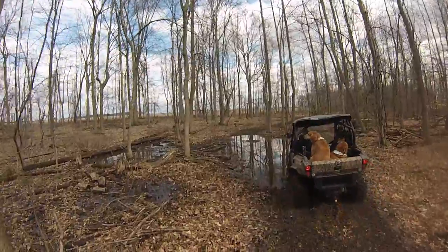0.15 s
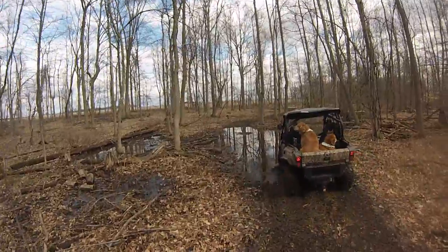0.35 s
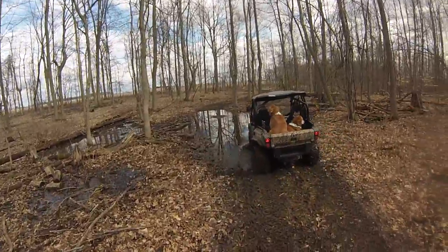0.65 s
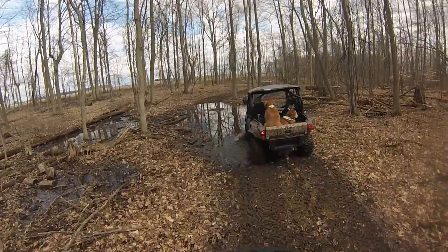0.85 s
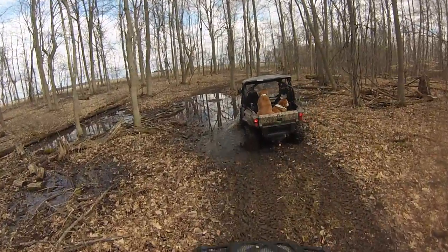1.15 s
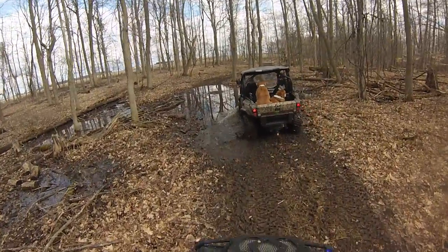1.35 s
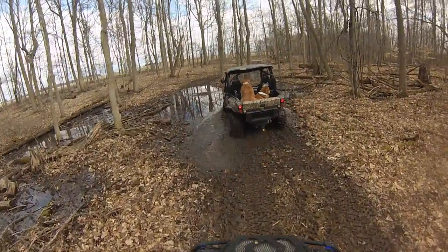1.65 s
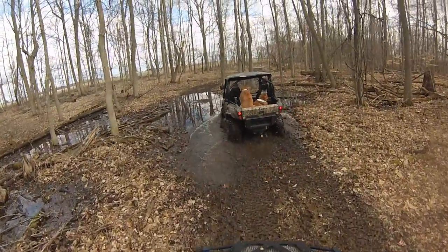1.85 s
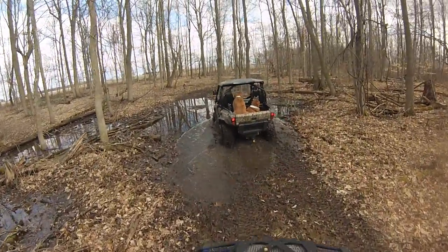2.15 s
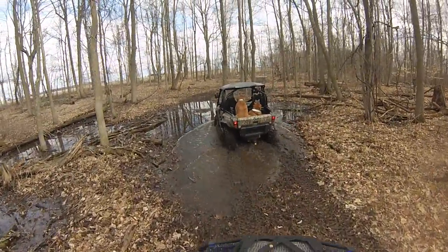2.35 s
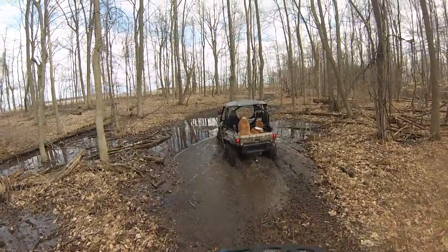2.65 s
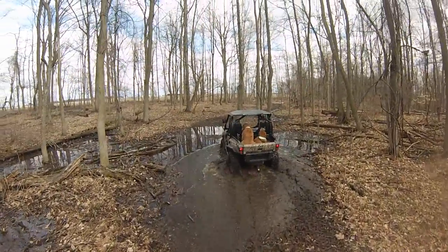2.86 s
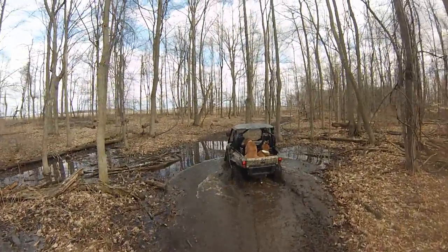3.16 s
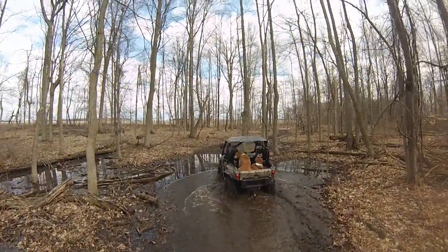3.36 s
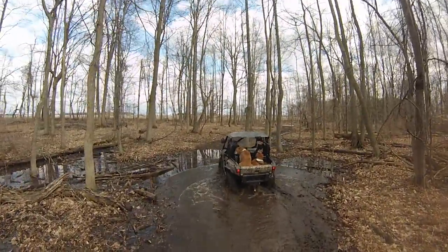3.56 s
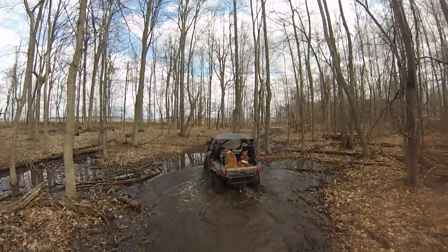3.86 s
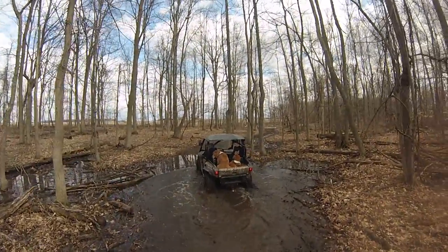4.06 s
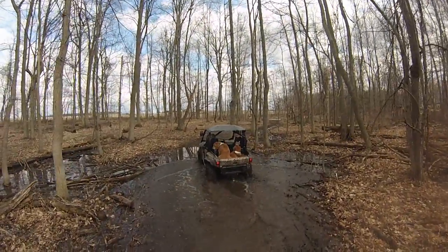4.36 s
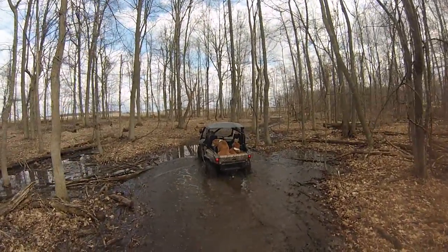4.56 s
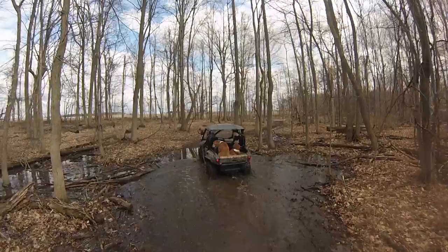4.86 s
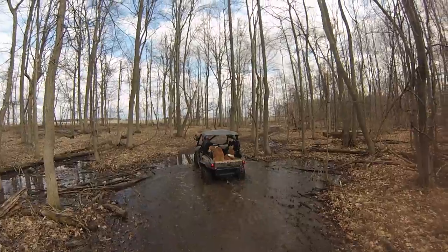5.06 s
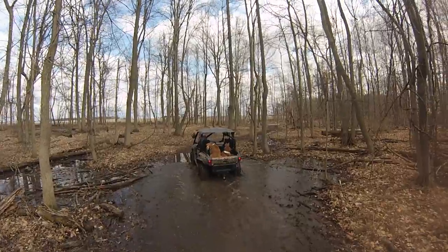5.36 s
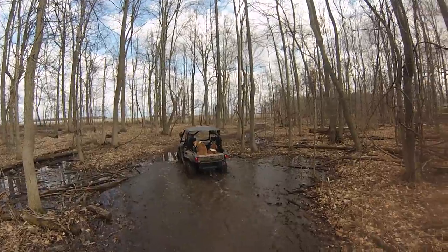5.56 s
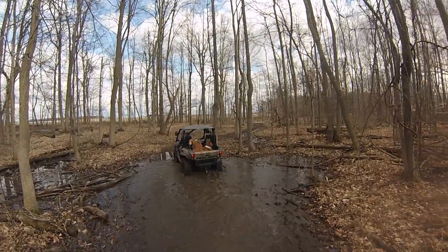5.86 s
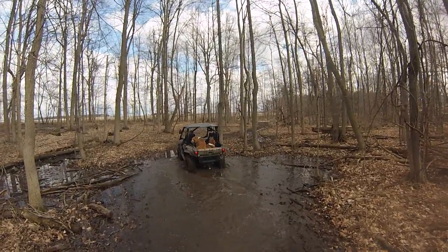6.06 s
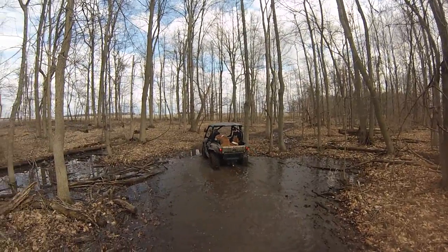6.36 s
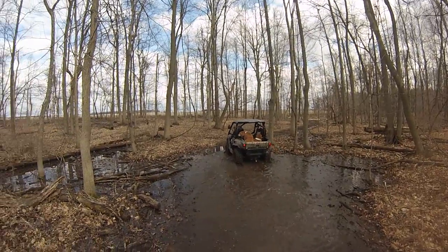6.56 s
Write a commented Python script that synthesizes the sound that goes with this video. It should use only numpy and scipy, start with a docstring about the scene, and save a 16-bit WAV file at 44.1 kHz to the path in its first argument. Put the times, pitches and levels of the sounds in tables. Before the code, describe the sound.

From 0 s a near twin-cylinder off-road engine pulls with a deep, muffled boom, swelling to about 0.6 s, easing near 1.2 s, then climbing to its strongest, fastest pull around 2.3-2.8 s. Tyre rumble, jolts, boxy housing hiss and dry frame rattle pulse with it; thin, fluttering gear whines come and go, most noticeable from 1.2 s. At about 2.8-2.9 s the throttle shuts, the boom collapses and short whines fall away. It stumbles and slows into a quiet, lumpy idle that lasts to the end at 6.7 s. The second engine, some metres ahead, emerges as a steadier buzzing drone, hardening around 3.2-3.8 s and slowly rising in pitch. From 3 s faint gurgles, spray and separate plops of muddy water grow, more frequent after 5.4 s. Outdoors, dry, microphone in a closed housing, faint hiss beneath.

```python
"""A muddy woodland trail, heard by a camera in a closed housing on a small off-road vehicle that follows another.
The near twin-cylinder engine, a sum of sines on its orders, pulls with a deep boom, swells, then drops to a lumpy idle.
The engine ahead, built the same way, drones on and slowly gains speed.
Shaped noise makes the rattle, housing hiss and tyre rumble; wavering sines make the gear whines;
short rising tones and noise bursts make the muddy water."""
import sys
import numpy as np
from scipy import signal
from scipy.io import wavfile
from scipy.ndimage import uniform_filter1d

SR = 44100
rng = np.random.default_rng(int(sys.argv[2]) if len(sys.argv) > 2 else 0)


def output_pcm(signal):
    """Save a mono or channel-first signal as 16-bit PCM at the path in sys.argv[1].

    Samples are clipped to [-1, 1] before scaling.
    """
    pcm = np.clip(np.atleast_2d(signal).T, -1, 1) * 32767
    wavfile.write(sys.argv[1], SR, np.round(pcm).astype(np.int16))


def elevation(decibels):
    """Turn decibel levels (scalar or array-like) into linear amplitude ratios."""
    levels = np.asarray(decibels, float)
    return 10 ** (levels / 20)


N = 295911
T = np.arange(N) / SR

# near engine under load: (time [s], cycle rate [Hz], exhaust boom on order 2 [dB])
PULL = [(0.0, 18.9, -46.0), (0.15, 19.2, -42.0), (0.3, 19.8, -41.4), (0.6, 20.28, -38.0),
        (0.9, 19.75, -38.5), (1.05, 19.27, -40.7), (1.2, 18.96, -44.0), (1.55, 19.35, -42.0),
        (1.8, 20.21, -37.8), (1.95, 20.69, -37.2), (2.25, 22.85, -35.0), (2.4, 23.49, -35.5),
        (2.55, 23.31, -33.8), (2.75, 22.45, -32.9), (2.8, 21.62, -33.3), (2.84, 20.89, -35.3),
        (2.87, 20.4, -38.5), (2.9, 20.1, -41.5), (2.915, 19.95, -57), (2.94, 19.76, -64)]
TWIN_GAP = 0.4  # share of a cycle between the two firings
PARKED_DB = -80  # rattle level that counts as no shake


def evened(x):
    """Scales a signal to rms 1."""
    return x / np.sqrt(np.mean(x ** 2) + 1e-20)


def curves(rows):
    """Columns over the whole time, after a window that is open while the table lasts."""
    s, *columns = np.transpose(rows)
    lasts_to_end = s[-1] > T[-1] - 0.1
    inside = (T >= s[0]) * ((T <= s[-1]) | lasts_to_end)
    gate = uniform_filter1d(1.0 * inside, size=2000)
    return gate, *(np.interp(T, s, c) for c in columns)


def bumps(rows, width):
    """Short bell-shaped changes of level in dB; width in s."""
    return sum(db * np.exp(-((T - s) / width) ** 2) for s, db in rows)


def drift(hz):
    """Slow random wander of rms 1, up to about hz."""
    knots = rng.standard_normal(int(T[-1] * 200))  # 200 a second
    smooth = signal.filtfilt(*signal.butter(2, np.clip(hz / 100, 0.01, 0.9)), knots)
    return np.interp(T, np.arange(len(knots)) / 200, evened(smooth))


def noise(points, patchy_db, band):
    """Random short-time spectra in drifting patches, close to rms 1 inside band (Hz)."""
    frames, hz = N // 512 + 5, np.fft.rfftfreq(2048, 1 / SR)
    real, imaginary, patches = rng.standard_normal((frames, 1025, 3)).T
    patches = uniform_filter1d(patches, size=12, axis=0)  # over frequency
    patches = evened(uniform_filter1d(patches, size=6, axis=1))  # over time
    f, db = np.transpose(points)
    shape = elevation(np.interp(np.log(hz + 1), np.log(f + 1), db, left=-90, right=-90))
    in_band = (hz > band[0]) & (hz < band[1])
    share = np.sum(shape[in_band] ** 2) / np.sum(shape ** 2)
    spectra = (real + 1j * imaginary) * shape[:, None] * elevation(patchy_db * patches)
    sound = signal.istft(spectra, nperseg=2048, noverlap=1536)[1][:N]
    return evened(sound) / np.sqrt(share)


def orders(cycle_hz, levels, uneven_db, lag, second=0.0, start=0.0, lead=0.0, pipe_hz=28.5, steep=16):
    """One sine per engine order; uneven firing shakes the high orders most."""
    turn = 2 * np.pi * (start + np.cumsum(cycle_hz) / SR)
    out = np.zeros(N)
    for k, db in levels:
        shake = uneven_db * np.sqrt(k)
        above = max(k - 5, 0)
        # the second cylinder's thump
        twin = np.angle(1 + second * np.exp(-2j * np.pi * k * TWIN_GAP))
        # reversed below the exhaust pipe's lowest resonance
        pipe = np.pi / (1 + (k * cycle_hz / pipe_hz) ** steep)
        phase = k * turn + lag * above ** 2 + lead * above + twin + pipe + 0.12 * shake * drift(8.0)
        out += np.sqrt(2) * elevation(db + shake * drift(8.8)) * np.cos(phase)
    return out, turn


def follow(law, load_db, rattle_db):
    """A level in dB that rises with engine load and with the shake of the frame."""
    rest_db, by_load, by_shake = law
    return rest_db + by_load * load_db + by_shake * (rattle_db - PARKED_DB)


def bubbles(begin_s):
    """Clumps of short bubbles that rise in pitch as they ring."""
    t, out = T[:1200], np.zeros(N)
    # typically 110 a second, shared among 12 pitches
    rate = 110 / 12 * elevation(4 * drift(3.0)) * (T > begin_s)
    for hz in np.geomspace(1050, 2600, num=12):
        tone = np.sin(2 * np.pi * hz * t * (1 + 6 * t))
        bubble = tone * (1 - np.exp(-t / 0.001)) * np.exp(-t * hz / 7)
        hits = (rng.random(N) < rate / SR) * elevation(2.5 * rng.standard_normal(N))
        out += signal.oaconvolve(hits, bubble)[:N]
    return out


def thrown_water(begin_s):
    """Spray: noise under random bursts that die away exponentially."""
    # thrown water: (frequency [Hz], relative density [dB per Hz])
    spray = [(850, -38), (1120, -1.5), (1300, -1.5), (1750, 2), (2100, -7), (2330, 7), (2600, -15.5),
             (3600, -17.5), (6000, -32)]
    throws_per_s, decay_s = 20, 0.009
    throws = (rng.random(N) < throws_per_s / SR) * (T > begin_s) * elevation(2.1 * rng.standard_normal(N))
    bursts = signal.oaconvolve(throws, np.exp(-T[:3000] / decay_s))[:N]
    return bursts * noise(spray, 1.0, band=[900, 2800])


def slosh():
    """Wheels ahead churn the puddle: gurgles and spray grow as they wade deeper, and single plops ring the housing."""
    # single loud plops: (time [s], peak level before the 3 dB cut below [dB], frequency [Hz])
    plops = [(3.552, -63, 1460), (3.681, -55.5, 1500), (3.8868, -64, 1440), (4.0055, -59, 1500),
             (4.8182, -64, 1530), (4.902, -69, 1450), (5.1235, -64, 1480), (5.4335, -60, 1480),
             (5.56, -62, 1500), (5.72, -68, 2350), (5.915, -64, 1200), (6.11, -67, 1150), (6.12, -65, 2150),
             (6.17, -61, 1600), (6.215, -68, 2350), (6.2513, -62, 1560), (6.256, -62, 1180),
             (6.3235, -63, 1490), (6.627, -63, 1460), (6.632, -65, 1120)]
    begin_s, growth_db_per_s = 2.9, 1.4
    water = elevation(-81) * bubbles(begin_s) + elevation(-82) * thrown_water(begin_s)
    out = elevation(growth_db_per_s * (T - begin_s)) * water
    t, plop_s = T[:1200], 0.005
    for s, db, hz in plops:
        part = out[round(s * SR):][:len(t)]
        plop = elevation(db - 3) * np.sin(2 * np.pi * hz * t) * np.exp(-(t / plop_s) ** 2)
        part += plop[:len(part)]
    return out


def ground_rumble(load_db, rattle_db, throb):
    """Body rumble and tyre growl pump with the engine cycle; ruts jolt them up and rolling to a stop adds a grumble."""
    # body rumble: (frequency [Hz], relative density [dB per Hz])
    rumble_shape = [(8, 13), (25, 28.5), (45, 19), (70, 25.5), (130, 8.5), (200, 6.5), (300, 1.5),
                    (400, 3.5), (560, 1.5), (700, 0), (900, -11), (1200, -28.5)]
    # tyres on rough ground: (frequency [Hz], relative density [dB per Hz])
    growl_shape = [(110, -31), (170, -1.5), (220, -2), (300, -3.5), (380, -11.5), (500, -30.5)]
    # ruts under the wheels: (time [s], lift [dB])
    jolts = [(.5, 3.5), (.93, 3.8), (1.88, 4.3), (2.03, 4.2), (2.18, 6.9), (2.3, 1.9), (2.4, 3), (2.5, 5.7),
             (2.56, 2.4), (2.78, 2.6)]
    # (level at rest [dB], gain per dB of load [dB], gain per dB of shake [dB])
    rumble_law = (-82, 0.31, 0.19)
    growl_law = (-88.5, .3, .9)
    stop_db = bumps([(3.3, 2)], 0.51)  # the near vehicle rolls to a stop
    lift_db = 0.75 * throb + bumps(jolts, 0.04) + stop_db
    rumble_db = follow(rumble_law, load_db, rattle_db) + lift_db
    growl_db = follow(growl_law, load_db, rattle_db) + lift_db
    rumble = noise(rumble_shape, 0.98, band=[400, 750]) * elevation(rumble_db)
    return rumble + noise(growl_shape, 1.1, band=[150, 400]) * elevation(growl_db)


def housing_hiss(load_db, rattle_db, throb, flicker):
    """Noise around the main ring of the housing, pumped by the engine cycle."""
    # (frequency [Hz], relative density [dB per Hz])
    hiss_shape = [(470, -43), (800, -13), (989, -10), (1220, -7), (1310, -7), (1370, -2), (1520, 3),
                  (1690, -6), (1950, -10), (2540, -29), (4290, -120)]
    # (level at rest [dB], gain per dB of load [dB], gain per dB of shake [dB])
    hiss_law = (-75.5, 0.19, 0.58)
    hiss_db = follow(hiss_law, load_db, rattle_db) + 1.1 * throb + 0.6 * flicker
    return noise(hiss_shape, 0.92, band=[1100, 1900]) * elevation(hiss_db)


def frame_rattle(rattle_db, throb, flicker):
    """The rolling frame rattles as noise, and loose parts tick faintly as short high rings."""
    # (frequency [Hz], relative density [dB per Hz])
    rattle_shape = [(1700, -34.5), (2000, -3.5), (2350, 0.5), (2600, -2), (2780, -8.5), (2960, -5.5),
                    (3100, -3.5), (3260, -2.5), (3450, -10.5), (5200, -13.5), (5900, -20.5), (6600, -17.5),
                    (7600, -31.5), (10500, -44.5)]
    level_db = rattle_db - 3.5 + 0.34 * throb + 0.71 * flicker
    rattle = noise(rattle_shape, 0.97, band=[2000, 4000]) * elevation(level_db)
    strength = elevation(1.5 * np.minimum(rng.exponential(1, N), 2.5)) * rng.standard_normal(N)
    hits = (rng.random(N) < 150 / SR) * strength  # about 150 a second
    t = T[:200]
    ring = np.sin(2 * np.pi * 5200 * t) + np.sin(2 * np.pi * 6700 * t) + 0.19 * np.sin(2 * np.pi * 9500 * t)
    tick = np.exp(-t / 0.00066) * ring
    return rattle + elevation(rattle_db - 8) * signal.oaconvolve(hits, tick)[:N]


def gear(start, length, hz, top_db):
    """A fuzzy whine on one swell: tooth contact flutters in level and pitch."""
    u = 2 * (T - start) / length - 1  # -1 at its start, 1 at its end
    swell_db = -14 * np.minimum(u ** 4, 10)  # starts and ends 14 dB under its top
    turn = 2 * np.pi * np.cumsum(hz * (1 + 0.0075 * drift(60.0))) / SR
    return np.sqrt(2) * elevation(top_db + swell_db + 3.0 * drift(29.0)) * np.sin(turn)


def drivetrain_whines():
    """Gear and belt whines follow the road speed, hold near one pitch or follow the crank."""
    # gear mesh tone, set by road speed: (time [s], frequency [Hz])
    road = [(0, 680), (.12, 660), (.33, 680), (.43, 735), (.52, 752), (.6, 680), (.9, 682), (1.15, 765),
            (1.3, 785), (1.55, 806), (1.62, 824), (1.8, 840), (2.05, 862), (2.2, 885), (2.785, 888),
            (2.85, 785), (2.89, 722), (2.95, 690), (3.1, 590)]
    # swelling with the road speed: (start [s], length [s], multiple of the mesh tone, top level [dB])
    meshed = [(-.1, .48, 1, -83), (.4, .16, 1, -83), (.56, .4, 1, -84), (1.22, .62, 1, -78.5),
              (1.22, .4, 3, -73.5), (1.56, .56, 3.08, -77), (2.1, .4, 3, -84), (2.5, .3, 3, -80),
              (1.22, .12, 1.97, -71), (1.38, .22, 1.99, -73), (1.3, .4, 3.95, -83), (.1, .75, 2.9, -85),
              (2.77, .1, 3, -71.5), (2.86, .05, 3, -79), (2.76, .15, 1, -80), (2.93, .13, .95, -81),
              (2.92, .1, 1.87, -72), (3.03, .07, 1.87, -80), (2.91, .07, 3.72, -79), (2.99, .08, 3.72, -78),
              (2.2, .35, 2.35, -78), (2.3, .46, 3.35, -80)]
    # holding near one pitch: (start [s], length [s], frequency [Hz], top level [dB])
    held = [(.2, 1., 3270, -86), (1.3, .6, 3270, -79), (2., .85, 3220, -85), (2.82, .05, 2360, -73.5),
            (2.9, .1, 3250, -82), (3.17, .08, 2350, -81), (-.1, .55, 1390, -80), (.55, .85, 1390, -77.5),
            (.52, .45, 1252, -84), (.88, .25, 2960, -84), (1.85, .6, 2965, -85)]
    # geared to the crank: (start [s], length [s], multiple of the engine cycle, top level [dB])
    cranked = [(1.28, .4, 54.6, -83), (1.9, .5, 55.8, -79), (2.4, .3, 54.5, -84), (2.68, .14, 54.5, -80)]
    mesh_hz, cycle_hz = curves(road)[1], curves(PULL)[1]
    rows = [(s, length, k * mesh_hz, db) for s, length, k, db in meshed] + list(held)
    rows = rows + [(s, length, k * cycle_hz, db) for s, length, k, db in cranked]
    return sum(gear(*row) for row in rows)


def engine_ahead():
    """A steadier, thinner drone from some metres away: one hard thump in every cycle."""
    # (time [s], cycle rate [Hz], order 6 before the lifts below [dB])
    ahead = [(0.0, 22.0, -70), (0.5, 21.6, -70.5), (0.75, 20.65, -72.8), (1.0, 19.19, -74.9),
             (1.5, 21.06, -73.3), (2.0, 21.84, -71.5), (2.25, 22.6, -69.5), (2.95, 23.9, -71.4),
             (3.31, 24.0, -71.6), (3.8, 24.6, -70.3), (4.04, 25.3, -70), (4.31, 25.7, -70),
             (4.44, 25.6, -69.6), (4.72, 26.2, -67.9), (4.98, 25.9, -67.4), (5.09, 26.4, -68),
             (5.32, 26.9, -68.1), (5.82, 26.6, -68.4), (5.94, 26.7, -70), (6.46, 27.3, -71.5),
             (6.7, 27.1, -71)]
    # (multiple of the cycle, level against order 6 [dB])
    ahead_orders = [(2, -4.5), (3, -7), (4, 5.5), (5, -11.5), (6, 0), (7, -9), (8, -13), (9, -8.5),
                    (10, -12), (11, -22), (12, -20.5), (14, -22), (15, -23.5), (18, -24), (20, -29)]
    # body panels and ground lift or hollow out orders that slide past: (frequency [Hz], width [Hz], lift [dB])
    panels = [(117.3, 7, 6), (208, 8, -4.5), (256, 13, 5.5), (322, 20, 5), (486, 8, 9), (526.4, 7, 11)]
    _, hz, sixth_db = curves(ahead)
    # it digs in entering the puddle: orders harden by their distance from the sixth
    dig_db_per_order = bumps([(3.75, 0.93)], 0.68)
    # just before, orders 14 and 15 blare out
    blare_db = bumps([(3.16, 9)], 0.4)
    levels = []
    for k, rel_db in ahead_orders:
        hard_db = dig_db_per_order * abs(k - 6) if k < 12 else blare_db * (k in (14, 15))
        panel_db = sum(lift * np.exp(-((k * hz - at_hz) / width) ** 2) for at_hz, width, lift in panels)
        levels.append((k, sixth_db + rel_db + hard_db + panel_db))
    return orders(hz, levels, uneven_db=0.2, lag=-0.08, pipe_hz=123, steep=8)[0]


def near_pull(crack_lead):
    """The exhaust under load: its gate, orders, cycle angle and load in dB; load roughens orders 6 and up."""
    # (multiple of the cycle, level against order 3 before the rasp [dB])
    pull_orders = [(1, -29), (4, -11.5), (5, -9.5), (6, -26), (7, -39.5), (8, -34.5), (9, -21.5), (10, -21),
                   (11, -20.5), (12, -27.5), (13, -28), (14, -33), (15, -23), (16, -33)]
    on, hz, boom_db = curves(PULL)
    # order 3 thins as the speed rises, and dies once the throttle shuts at 2.75 s
    third_db = -50.5 - 2 * (hz - 18.32) - 130 * np.clip(T - 2.75, 0, 0.25)
    load_db = np.maximum(boom_db + 47, 0)  # a boom of -47 dB or less counts as no load
    rasp_db = -5.5 + 0.32 * load_db
    levels = [(2, boom_db), (3, third_db)]
    levels += [(k, third_db + db + (k > 5) * rasp_db) for k, db in pull_orders]
    pull, turn = orders(hz, levels, uneven_db=0.46, lag=0.0, start=-0.3, lead=crack_lead)
    return on, pull, turn, load_db


def near_idle():
    """The exhaust with the throttle shut: its gate, orders and cycle angle; stumbles make firings weak or strong."""
    # (time [s], cycle rate [Hz], order 5 before the stumbles [dB])
    idle_curve = [(2.92, 14.13, -66), (3.0, 13.55, -68), (3.1, 13.48, -62.4), (3.25, 12.93, -60.5),
                  (3.45, 12.16, -61.3), (3.85, 11.76, -60.5), (4.05, 11.21, -59.6), (4.25, 11.05, -60.4),
                  (4.45, 10.05, -61.1), (4.75, 9.83, -58.4), (5.05, 10.37, -57.3), (5.45, 10.0, -58.0),
                  (5.65, 10.34, -57.6), (5.85, 10.12, -60.8), (6.65, 10.02, -60.8)]
    # (multiple of the cycle, level against order 5 [dB])
    idle_orders = [(1, -25.5), (6, -17), (7, -15), (8, -10.5), (9, -20.5), (10, -24), (11, -33.5)]
    # low orders sink out of the pipe's reach as the engine slows:
    # (multiple of the cycle, level at 9.85 Hz [dB], gain per Hz of cycle rate [dB], top level [dB])
    idle_low = [(2, -77, 2.3, -61), (3, -64, 3.64, -49), (4, -70, 4.5, -60.5)]
    # weak or strong firings: (time [s], change [dB])
    stumbles = [(2.915, -6), (2.96, 4), (3.135, 3), (3.175, -12), (3.25, -7), (3.29, 3), (3.33, -6),
                (3.44, -4), (3.63, -5), (3.81, -4), (3.96, -5)]
    off, hz, fifth_db = curves(idle_curve)
    levels = [(k, np.minimum(db + gain * (hz - 9.85), top_db)) for k, db, gain, top_db in idle_low]
    levels += [(5, fifth_db)] + [(k, fifth_db + db) for k, db in idle_orders]
    idle, turn = orders(hz, levels, uneven_db=0.25, lag=-0.05, second=0.9, start=-0.28)
    return off, elevation(bumps(stumbles, 0.025)) * idle, turn


def near_engine():
    """Joins pull and idle; returns the exhaust, the throb of its cycle and its load in dB."""
    crack_lead = 1.85  # radians of the cycle by which the crack of orders 6 and up precedes the boom
    on, pull, turn, load_db = near_pull(crack_lead)
    off, idle, slow_turn = near_idle()
    turn = turn + crack_lead
    pull_throb = np.cos(turn) + 0.29 * np.cos(2 * turn)
    idle_throb = np.cos(slow_turn) + np.cos(2 * slow_turn - 2 * np.pi * TWIN_GAP)
    throb = on * pull_throb + 0.13 * off * idle_throb
    # under load each cycle starts as a pressure drop
    return off * idle - on * pull, throb, load_db


def scene():
    """Sums both engines, the running noises of the near vehicle and the water."""
    # how hard the rolling frame shakes: (time [s], rattle level before trims [dB])
    shake = [(0, -74), (.25, -72.5), (.45, -71.5), (1, -70), (1.4, -68.5), (1.85, -69.5), (2.3, -69),
             (2.85, -70.5), (3.1, -75.5), (3.3, -76), (4, -78), (4.8, -80.5), (5.6, -79.5), (6.7, -80.5)]
    exhaust, throb, load_db = near_engine()
    rattle_db = curves(shake)[1]
    flicker = drift(29.0)  # shared by hiss and rattle
    running = ground_rumble(load_db, rattle_db, throb)
    running = running + housing_hiss(load_db, rattle_db, throb, flicker)
    running = running + frame_rattle(rattle_db, throb, flicker)
    return (slosh() + running + drivetrain_whines() + engine_ahead() + exhaust)[None]


def band_limit(x):
    """A steep low-pass at the top of the band."""
    return signal.sosfilt(signal.butter(12, 12600, fs=SR, output="sos"), x)


def record(dry):
    """The microphone adds hiss and the camera electronics a faint steady whine."""
    # microphone hiss: (frequency [Hz], relative density [dB per Hz])
    hiss_floor = [(2060, -41), (3500, -3), (4560, -5.5), (5100, -7), (6140, -6), (6650, -4), (7520, -6.5),
                  (12400, -10.5), (16200, -42.5), (22000, -120)]
    # camera electronics: (frequency [Hz], peak level [dB])
    electronic = [(3596.4, -95), (7192.8, -99), (10789.2, -102)]
    hiss = elevation(-87.5) * noise(hiss_floor, 0.93, band=[5000, 13000]) * elevation(0.5 * drift(6.8))
    whine = sum(elevation(db) * np.sin(2 * np.pi * hz * T) for hz, db in electronic)
    return band_limit(dry + hiss + whine)


dry = scene()
out = record(dry)
output_pcm(out)
```